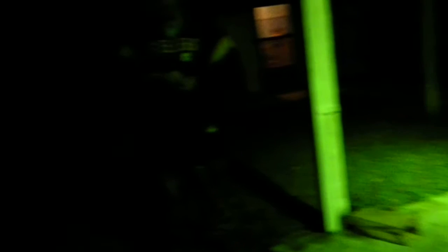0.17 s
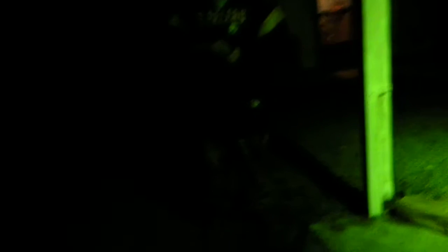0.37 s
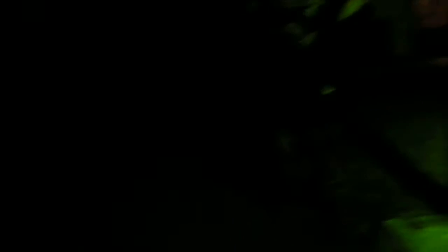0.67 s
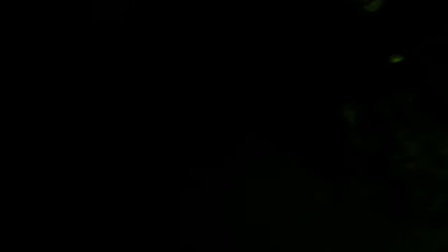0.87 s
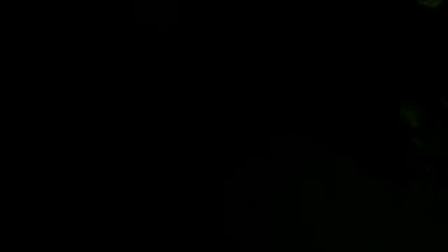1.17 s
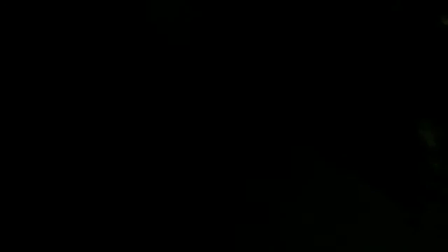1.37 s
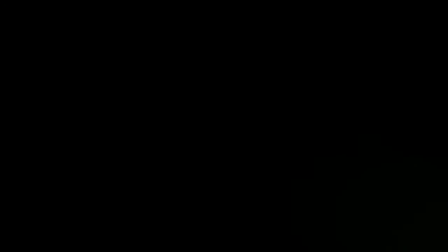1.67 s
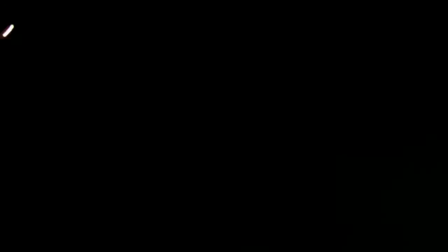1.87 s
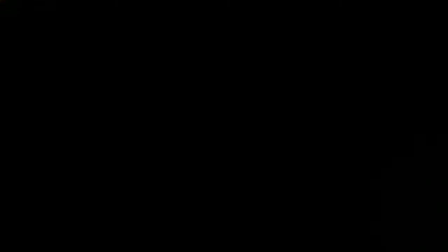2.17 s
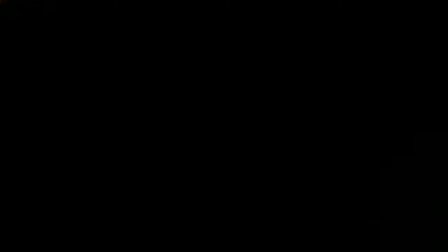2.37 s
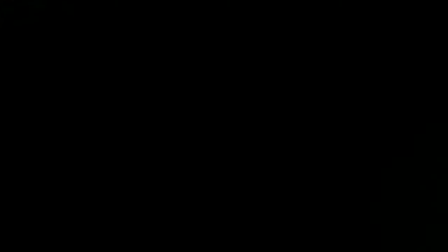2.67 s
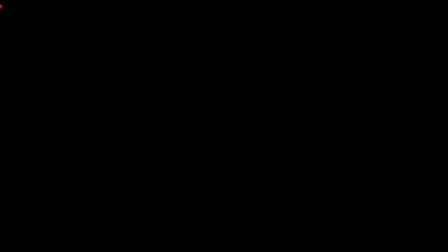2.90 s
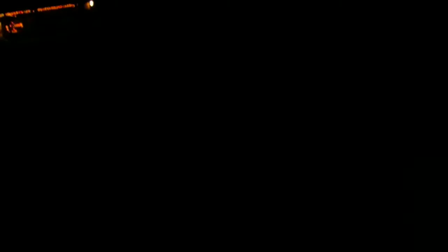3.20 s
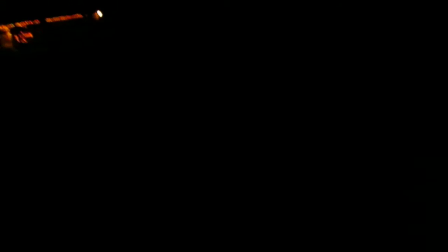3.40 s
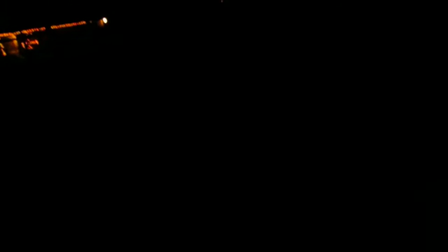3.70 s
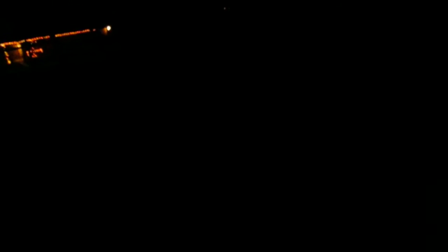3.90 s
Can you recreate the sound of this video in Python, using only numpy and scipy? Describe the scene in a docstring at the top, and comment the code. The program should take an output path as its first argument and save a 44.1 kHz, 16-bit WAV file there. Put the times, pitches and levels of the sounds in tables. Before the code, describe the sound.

Outdoors at night, a small close camera microphone picks up grass and clothes rustling, crunches underfoot and dry ticks over far traffic rumble, a wavering low hum and faint insects. Just after two seconds a snap pop bursts very close, clipping hard, with a low thump, quick bright rings and a hiss scattered back by trees. The sound ducks briefly, then sparse ticks continue.

```python
"""Snap pop in a yard at night

A snap pop bursts on the ground close to a small camera and overloads it: a needle and a low swing.
The ground and a wall answer with short rings, then the trees hiss the crack back as fading noise.
Feet and clothes rustle (crackling noise) and snap (short filtered puffs) in the grass.
Far traffic, a low hum and insects fill the night, each a band of coloured noise."""
import sys
import numpy as np
from scipy import signal
from scipy.fft import rfft, irfft, next_fast_len
from scipy.io import wavfile
from scipy.ndimage import uniform_filter1d, map_coordinates

SR = 44100
rng = np.random.default_rng(int(sys.argv[2]) if len(sys.argv) > 2 else 0)


def generate_wav(signal):
    """Clip the signal to [-1, 1] and save it as 16-bit WAV at the path in sys.argv[1]."""
    frames = np.transpose(np.atleast_2d(signal))
    scaled = np.clip(frames, -1, 1) * 32767
    pcm = np.round(scaled).astype(np.int16)
    wavfile.write(sys.argv[1], SR, pcm)


N = 178605
TIME = np.arange(N) / SR  # seconds


def amp(db):
    """Turn decibels into a plain multiplier."""
    return 10 ** (np.asarray(db) / 20)


def unit(x):
    """Scale a sound to an rms (average strength) of 1."""
    return x / np.sqrt(np.mean(x ** 2) + 1e-20)


def along(points, hz):
    """Read a curve of (Hz, value) points, evenly spaced by pitch rather than by Hz."""
    point_hz, values = np.transpose(points)
    return np.interp(np.log(hz + 1), np.log(point_hz + 1), values)


def curves(rows):
    """One value per sample for each column after the time, in straight lines between rows."""
    seconds, *columns = np.transpose(rows)
    return [np.interp(TIME, seconds, column) for column in columns]


def wobble(rate):
    """A smooth random curve with rate random points a second."""
    points = rng.standard_normal(int(N * rate / SR) + 4)
    return map_coordinates(points, [TIME * rate])


def filtered(x, response):
    """Filter x by a response, a function that gives a multiplier for every frequency."""
    m = next_fast_len(len(x) + 8192)  # spare room lets the filter ring out
    spectrum = rfft(x, m) * response(np.fft.rfftfreq(m, 1 / SR))
    return irfft(spectrum, m)[:len(x)]


def resonance(hz, width):
    """Response of one resonance: strongest at hz, ringing only after it is struck."""
    return lambda f: 1j * f * width / (hz * hz - f * f + 1j * f * width + 1e-9)


def noise(response, grain_db):
    """Coloured noise of rms 1; grain_db breaks it into millisecond crackle."""
    grainy = rng.standard_normal(N) * amp(grain_db * wobble(900))
    return unit(filtered(grainy, response))


def swell(start, length, rise, sag, fall):
    """Level in dB under the top: a rise, a sagging hold, a release (slopes in dB a second)."""
    t = TIME - start
    return rise * np.minimum(t, 0) - sag * np.clip(t, 0, length) - fall * np.maximum(t - length, 0)


def power_sum(levels_db):
    """Multiplier for unrelated sounds heard together: their powers add."""
    return np.sqrt(sum(amp(db) ** 2 for db in levels_db))


def traffic():
    """Far traffic is a steady low rumble of noise whose level wavers very slightly."""
    # Loudness of the far night sound by pitch. Each row: frequency in Hz, relative level in dB per Hz.
    night_color = [(20, -51), (50, -8.5), (100, 3), (170, -3), (300, -2), (700, -6.5), (1200, -13),
                   (1900, -17), (3400, -29.5), (7000, -19), (9000, -27)]
    level_db = -56.5 + 0.25 * wobble(3.1)
    return amp(level_db) * noise(lambda f: amp(along(night_color, f)), grain_db=0.0)


def low_hum():
    """The hum is grainy noise through a few low resonances, its level rising, falling and wavering."""
    # Course of the hum. Each row: time in seconds, level in dB before the waver.
    hum_levels = [(0, -59), (.36, -61.5), (.56, -58), (.78, -66), (.85, -52), (1.03, -64), (1.28, -49.5),
                  (1.6, -54.5), (1.8, -64), (2.1, -56), (2.3, -64), (2.6, -72.5), (3.05, -60), (3.15, -69),
                  (3.43, -55.5), (3.6, -67), (3.72, -55), (4.05, -66)]
    # Resonances of the hum. Each row: frequency in Hz, width of one pass in Hz, relative level in dB.
    hum_modes = [(245.8, 39.6, -2.5), (291.5, 31.4, 0), (344.5, 41, -3.5), (421, 79, -9)]
    waver_db, waver_rate = 2, 12  # depth in dB, random points a second
    db, = curves(hum_levels)
    # squaring runs each resonance twice, for a narrower peak
    hum = noise(lambda f: sum(amp(g) * resonance(c, w)(f) ** 2 for c, w, g in hum_modes), grain_db=5)
    return amp(db + waver_db * wobble(waver_rate)) * hum


def insects():
    """Two insect choruses sing side by side in one narrow band, each wavering on its own."""
    # The choruses: middle frequency in Hz, width of one filter pass in Hz, level of each in dB
    # before its waver.
    insect_band = (2539, 230, -65.5)
    hz, width, level_db = insect_band
    out = np.zeros(N)
    for side_hz in (-90, 90):
        band = resonance(hz + side_hz, width)
        chorus = noise(lambda f: band(f) ** 2, grain_db=0)
        out += amp(level_db + 1.5 * wobble(3)) * chorus
    return out


def rustle():
    """Grass and cloth crackle in a fine hiss with a coarser lower part."""
    # Movements through the grass. Each row: start in seconds, length in seconds, fine level in dB,
    # coarse level in dB, both before the shared waver.
    moves = [(0.069, 0.029, -58, -49.5), (0.198, 0.028, -58.5, -58), (0.363, .025, -52.5, -50.5),
             (0.557, .17, -50, -51), (0.771, 0.038, -56.5, -59), (0.848, 0.074, -61, -51.5),
             (0.962, 0.088, -52, -51.5), (1.157, 0.075, -59, -54), (1.255, 0.11, -46, -46.5),
             (1.388, 0.27, -51, -53.5), (2.039, .06, -54, -51), (2.1, .1, -47, -51.5),
             (2.555, 0.053, -46, -69), (2.775, 0.023, -70, -69), (2.88, .07, -70, -69)]
    # The grass stirs between movements. Each row: time in seconds, fine level in dB, coarse level in dB,
    # both before the shared waver.
    stir = [(0, -52.5, -66), (.13, -59, -58.5), (.33, -64.5, -61.5), (1.1, -67, -58.5),
            (1.75, -67.5, -57.5), (1.95, -57.5, -58.5), (2.7, -57, -55.5), (3.0, -57.5, -62.5),
            (3.16, -67.5, -65.5), (3.45, -65.5, -60.5), (3.81, -60, -59), (4.05, -59.5, -59)]
    rise, sag, fall = 700, 16.5, 350.5  # slopes of a movement, dB a second
    fine_db, coarse_db = curves(stir)
    shapes = [swell(start, length, rise, sag, fall) for start, length, *_ in moves]
    fine_gain = power_sum([fine_db] + [row[2] + shape for row, shape in zip(moves, shapes)])
    coarse_gain = power_sum([coarse_db] + [row[3] + shape for row, shape in zip(moves, shapes)])
    fine = fine_gain * noise(resonance(4200, 4400), grain_db=1.5)
    coarse = coarse_gain * noise(resonance(904, 1900), grain_db=3.5)
    return amp(1.5 * wobble(25)) * (fine + coarse)


def puff(s, t60):
    """Start sample and 60 ms of noise that loses 60 dB in t60 seconds (at least 1 ms)."""
    t = np.arange(round(SR * .06)) / SR
    x = rng.standard_normal(len(t)) * amp(-60 * t / max(t60, .001))
    return round(s * SR), x


def snap(out, s, db, knock_db, hz, width, knock_hz, t60, order):
    """A snap is a sharp break and a bright spit of noise over a duller knock."""
    at, x = puff(s, t60)
    x[0] = -5.0  # the break itself
    knock_width = 0.49 * knock_hz
    bright = filtered(x, lambda f: resonance(hz, width)(f) ** order)
    knock = filtered(x, lambda f: resonance(knock_hz, knock_width)(f) ** order)
    bright = bright / np.abs(bright).max()
    knock = knock / np.abs(knock).max()
    out[at:at + len(x)] += amp(db) * (bright + amp(knock_db) * knock)


def snaps():
    """Crunches underfoot and ticking dry stalks are snaps; the ticks are filtered twice and ring cleaner."""
    # Crunches underfoot. Each row: start in seconds, peak of the bright part in dB,
    # knock in dB over that peak, knock frequency in Hz, time for the noise to die by 60 dB in seconds.
    crunches = [(0.0717, -36, 3, 1090, .028), (.155, -56, 15, 300, 0.014), (0.3608, -26, -7, 490, 0.026),
                (.3685, -29, -10, 600, .039), (0.6115, -31, -23, 1100, 0.028), (.641, -39, 3, 1050, 0.026),
                (.6768, -19, -9, 1020, 0.0021), (.679, -23.5, -22, 1040, 0.04),
                (0.707, -35, -3, 1000, 0.045), (0.7993, -37.5, -2.5, 600, 0.048),
                (0.8437, -27.5, 0.5, 554, .012), (.8507, -32, 0.5, 540, .03), (.8716, -31, 6, 690, 0.0065),
                (.8785, -32, -1.5, 700, 0.022), (0.9653, -42, 6.5, 990, 0.091),
                (0.9782, -36, 3.5, 1040, 0.048), (0.9862, -32, -19, 1000, .025),
                (1.1101, -56.5, 16, 690, 0.02), (1.15, -56, 16.5, 780, 0.048),
                (1.152, -62.5, 20, 1490, .05), (1.2395, -41, 3, 940, 0.016), (1.2507, -41, -7, 950, .009),
                (1.2682, -31, -18, 900, .024), (1.30, -28.5, -8, 1300, 0.017), (2.028, -40, 6.5, 900, 0.02),
                (2.0388, -31.5, -26, 910, 0.022), (2.0667, -30, -13, 900, 0.013),
                (2.096, -49, 12.5, 700, 0.062), (2.786, -51.5, 12, 950, 0.044),
                (2.794, -40.5, 7.5, 1030, 0.045), (2.80, -42, 10, 1240, 0.024), (3.145, -50, 7, 900, 0.019)]
    # Dry stalks tick. Each row: start in seconds, peak of the bright part in dB,
    # knock in dB over that peak, bright frequency in Hz, time for the noise to die by 60 dB in seconds.
    ticks = [(.134, -33, -21, 6000, .006), (0.2699, -34, -23, 6740, 0.0071), (.623, -33.5, -26, 3500, .022),
             (1.209, -36.5, -27, 6000, 0.035), (2.1247, -28, -3.5, 4800, 0.022),
             (2.1285, -19, -12.5, 5460, 0.012), (2.1327, -18.5, -18, 4450, 0.028),
             (2.1365, -17, -19, 4600, 0.0042), (2.2022, -24, -26, 5800, 0.036),
             (2.5648, -27, -30, 3980, 0.011), (2.8775, -35, -23, 4800, .006),
             (2.8885, -32, -18, 5300, 0.026), (2.9052, -31, -25, 6040, 0.0085),
             (2.932, -37, -28, 5600, .011), (3.1104, -44, -22, 4130, 0.011), (3.5685, -48, -20, 3300, .008),
             (3.582, -38, -10, 2800, 0.014), (3.591, -36, -10.5, 2900, .012), (3.6025, -40, -20, 2900, .01),
             (3.6317, -40, -25, 5000, .01), (4.0216, -37.5, -15, 5420, 0.0073),
             (4.0381, -16, -29, 5760, 0.0096)]
    out = np.zeros(N + SR)
    for s, db, knock_db, knock_hz, t60 in crunches:
        snap(out, s, db, knock_db, hz=2730, width=2160, knock_hz=knock_hz, t60=t60, order=1)
    for s, db, knock_db, hz, t60 in ticks:
        snap(out, s, db, knock_db, hz=hz, width=3360, knock_hz=998, t60=t60, order=2)
    return out[:N]


def trees():
    """Leaves scatter the crack: near ones flash, the ring of trees holds and lets go, far ones linger."""
    # Color of the leaf hiss. Each row: frequency in Hz, relative level in dB per Hz.
    foliage = [(300, -32), (800, -9), (1800, -3.5), (4000, 4.5), (6900, 6.5), (9000, 0.5)]
    echo_s, ring_end_s = 2.222, 2.344
    t = np.maximum(TIME - echo_s, 0)
    # levels in dB, slopes in dB a second
    near_db = -10 - 996.5 * t
    ring_db = -23 + swell(echo_s, ring_end_s - echo_s, rise=0, sag=25, fall=158)
    far_db = -32.5 - 52.5 * t
    gain = power_sum([near_db, ring_db, far_db])
    hiss = noise(lambda f: amp(along(foliage, f)), grain_db=-0.5)
    return (TIME > echo_s) * gain * hiss


def bounces():
    """The ground and a wall throw the crack back as short rings with a slightly unsteady pitch."""
    # Near echoes. Each row: start in seconds, peak in dB, ring frequency in Hz,
    # time to die by 60 dB in seconds.
    near_echoes = [(2.21615, -10, 5400, .012), (2.2162, -18, 2400, .008), (2.21735, -9, 6900, .006),
                   (2.2193, -14, 5000, .004), (2.2204, -12, 5800, .006), (2.2314, -19, 330, .015),
                   (2.23165, -1, 6500, .0035)]
    out = np.zeros(N)
    t = np.arange(SR // 50) / SR
    for s, db, hz, t60 in near_echoes:
        drift = np.cumsum(rng.normal(0, .12, len(t)))  # random phase steps roughen the tone
        onset = 1 - np.exp(-t / .00015)
        ring = np.sin(2 * np.pi * hz * t + drift) * amp(-60 * t / t60) * onset
        out[round(s * SR):][:len(t)] += amp(db) * ring / np.abs(ring).max()
    return out


def burst():
    """A needle of overpressure; suction pins the microphone, which then swings back at its low resonance."""
    burst_s, pinned_s = 2.21427, .00055
    turn, damping = 2 * np.pi * 172, 430  # swing in radians a second, decay per second
    t = np.maximum(TIME - burst_s - pinned_s, 0)  # stays at zero while the microphone is pinned
    swing = np.exp(-damping * t) * (.72 * np.cos(turn * t) - np.sin(turn * t))
    swing = swing * (TIME > burst_s)
    needle = np.exp(-((TIME - burst_s + .00002) / .00002) ** 2)
    return amp(5) * needle - swing


def scene():
    """Add the night, the grass, the echoes and the burst together in one channel."""
    background = traffic() + low_hum() + insects()
    grass = rustle() + snaps()
    return (background + grass + trees() + bounces() + burst())[None]


def record(dry):
    """Gain control ducks after the loud peak and recovers; a narrow converter, clipping, a band limit."""
    # The converter's edge, with a faint mirror band above half its rate.
    # Each row: frequency in Hz, level in dB.
    converter = [(7000, 0), (7500, -3), (7800, -14), (7950, -35), (8000, -70), (8050, -42), (8200, -24),
                 (8400, -15), (8800, -20), (9100, -36), (9300, -80)]
    top_hz = 16850
    x = dry[0]
    over = np.maximum(uniform_filter1d(np.abs(x), 65) - .3, 0)  # average level above the threshold
    recovery = np.exp(-np.arange(SR // 2) / SR / .07)
    duck = signal.fftconvolve(np.pad(over, (220, 0)), recovery)[:N]  # reacts 220 samples (5 ms) late
    x = x * amp(-10 * duck / (duck.max() + 1e-9))  # 10 dB down at the deepest
    x = filtered(x, lambda f: amp(along(converter, f)) * (f < 9300))
    x = x + amp(-96.5) * noise(lambda f: f < 9000, grain_db=2.5)  # the electronics hiss faintly
    x = x / (1 + np.abs(x / .74) ** 12) ** (1 / 12)  # clips at .74 with a slightly rounded corner
    return filtered(x, lambda f: f < top_hz)[None]


dry = scene()
out = record(dry)
generate_wav(out)
```